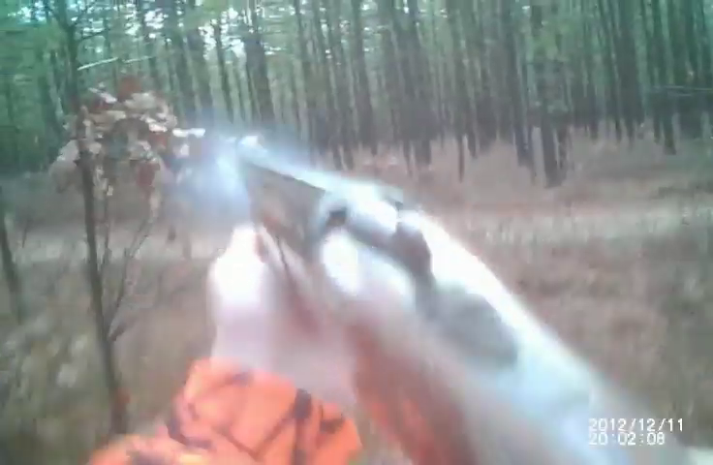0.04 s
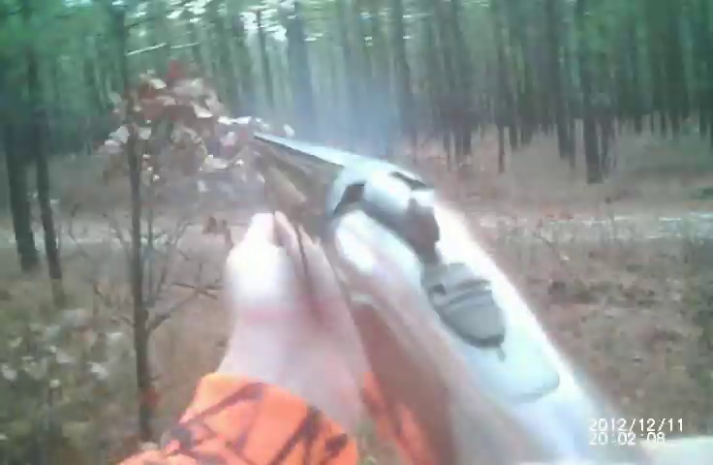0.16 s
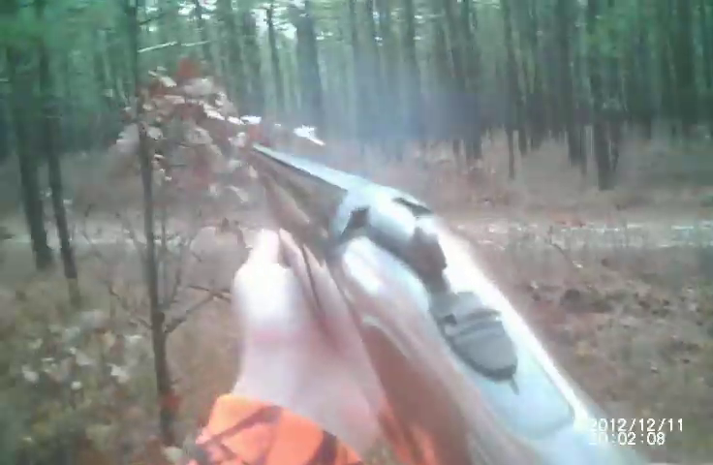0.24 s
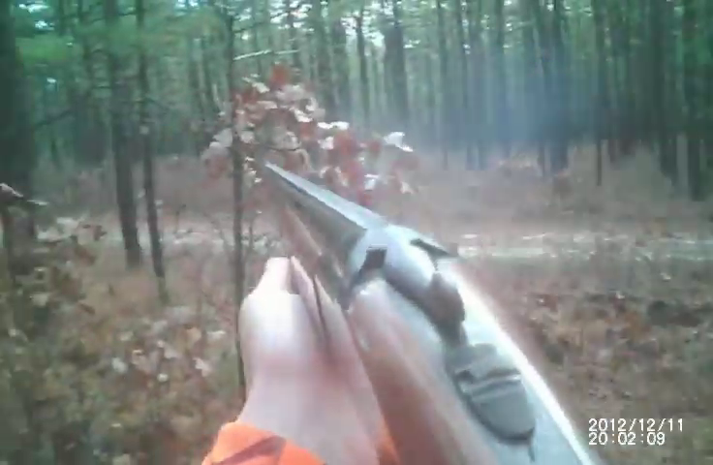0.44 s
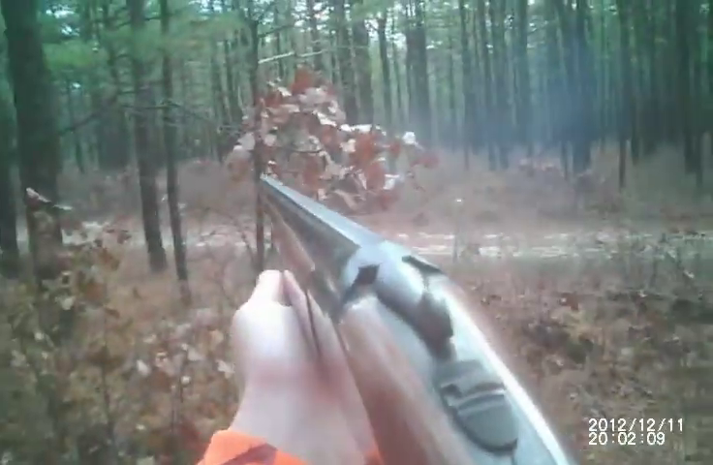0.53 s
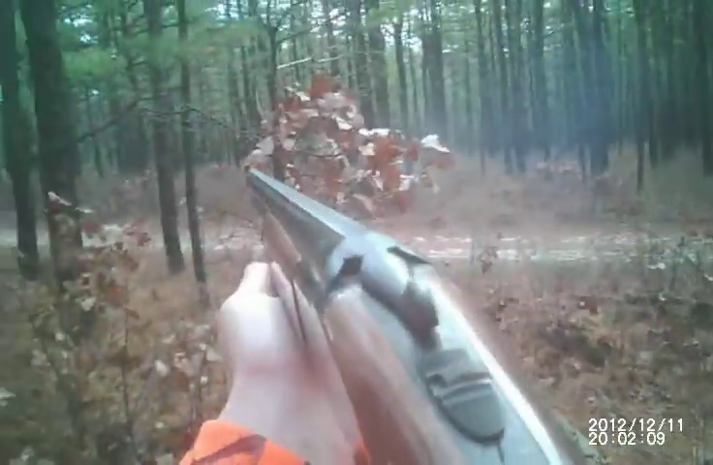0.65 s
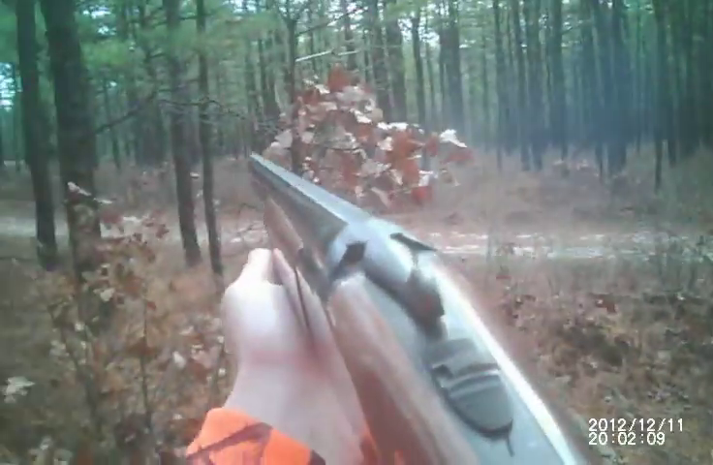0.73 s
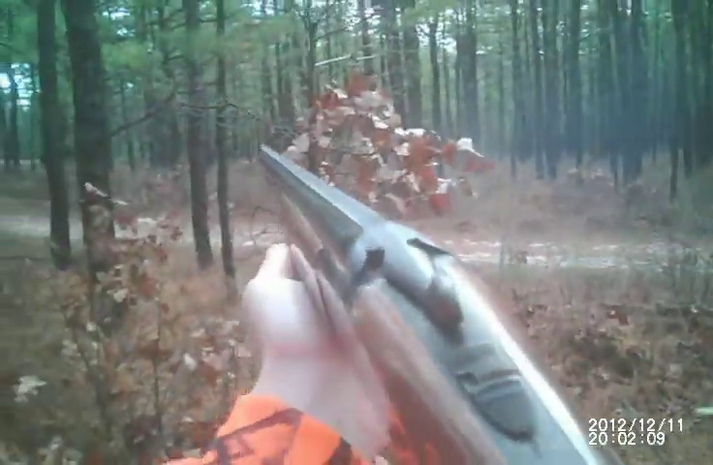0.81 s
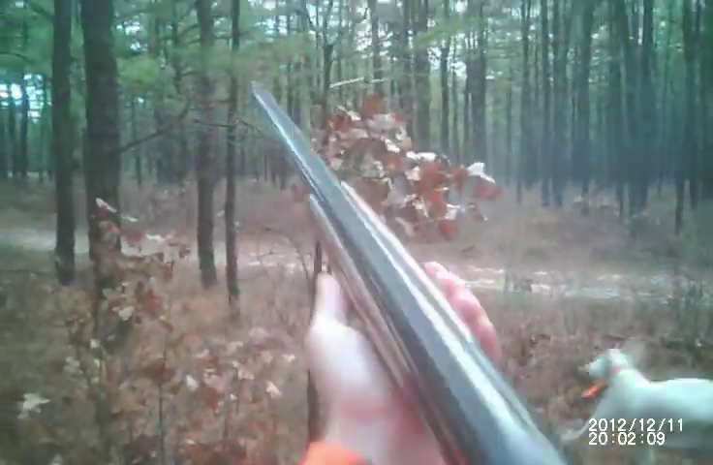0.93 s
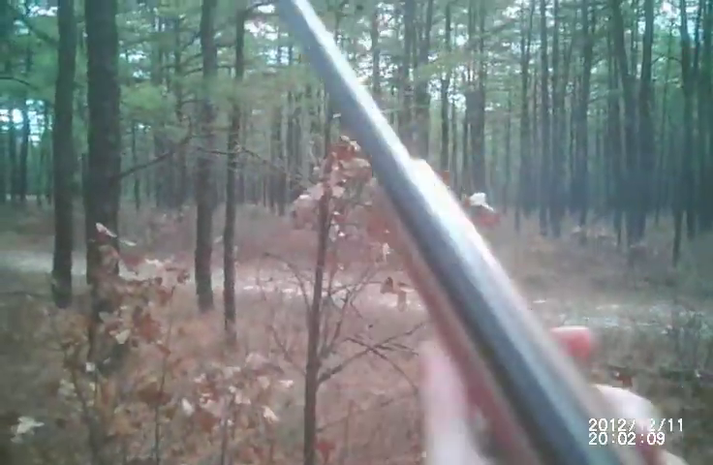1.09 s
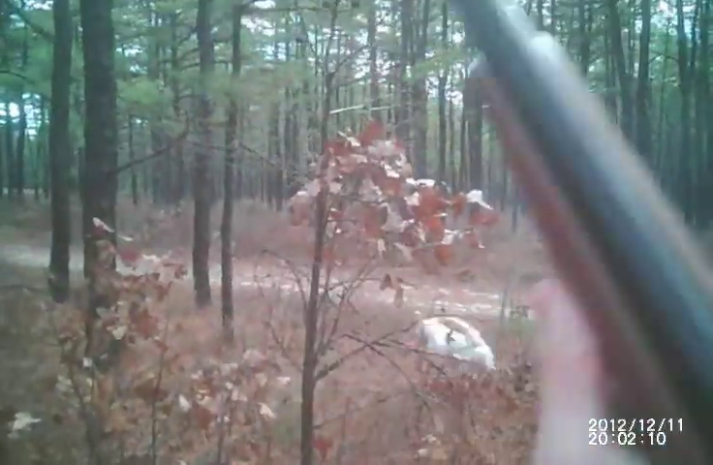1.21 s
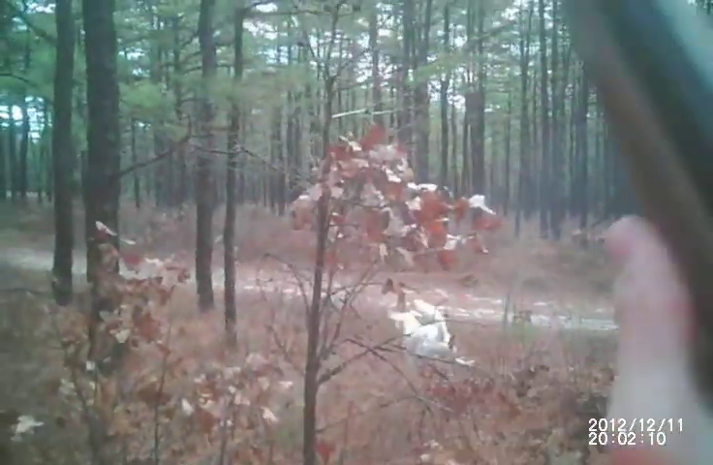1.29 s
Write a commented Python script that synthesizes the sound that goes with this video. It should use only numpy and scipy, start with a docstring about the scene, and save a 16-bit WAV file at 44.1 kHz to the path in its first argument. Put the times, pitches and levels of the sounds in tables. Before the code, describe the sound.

A shotgun blast very close to a small, cheap head-worn camera in a pine wood; a faint dog-collar bell and tiny trigger tick come just before, then a clipped, dull roar of echoes swells and fades.

```python
"""A dog's collar bell tinkles, then a shotgun fires next to a small head camera in a pine wood.
The muzzle blast, an N-shaped wave with a burst of gas noise, overloads the input. Random echoes from
the trunks make a dense roar that swells and fades, band by band; low echoes and a soft hiss lie under it.
Bell and trigger tick are decaying modes. The camera samples at 8 kHz, clips, and plays at the full rate."""
import sys
import numpy as np
from scipy import signal
from scipy.fft import rfft, irfft
from scipy.io import wavfile

SR = 44100
rng = np.random.default_rng(int(sys.argv[2]) if len(sys.argv) > 2 else 0)


def unload_wav(signal):
    """Save mono or channel-first audio to the path in sys.argv[1] as 16-bit WAV at rate SR, clipped to [-1, 1]."""
    wavfile.write(
        sys.argv[1],
        SR,
        np.round(np.clip(np.atleast_2d(signal).T, -1, 1) * 32767).astype(np.int16),
    )


def voltage_ratio(level):
    """Linear amplitude factor for a level in decibels (scalar or array-like)."""
    return 10 ** (np.asarray(level, float) / 20)


N = 59535  # samples
SHOT_S = 0.2165


def unit(x):
    """Scale to rms 1."""
    return x / np.sqrt(np.mean(x ** 2))


def band_noise(low_hz, high_hz):
    """Band-passed white noise of rms 1."""
    sos = signal.butter(2, [low_hz, high_hz], "band", fs=SR, output="sos")
    return unit(signal.sosfilt(sos, rng.standard_normal(N)))


def fade(t, start_s, t60_s):
    """Exponential decay from start_s, 60 dB per t60_s; zero before."""
    return (t >= start_s) * np.exp(-np.log(1000) * np.maximum(t - start_s, 0) / t60_s)


def ring(t, start_s, level_db, modes):
    """Decaying sine modes set ringing by one blow."""
    out = 0
    for hz, mode_db, t60_s in modes:
        sine = np.sin(2 * np.pi * hz * (t - start_s))
        out = out + voltage_ratio(level_db + mode_db) * fade(t, start_s, t60_s) * sine
    return out


def coloured(source, table):
    """Shape a sound by the first two columns (Hz, dB); returns its spectrum and log-frequency axis."""
    rows = np.array(table, float)
    log_hz = np.log(np.arange(N // 2 + 1) * SR / N + 1)
    gain_db = np.interp(log_hz, np.log(rows[:, 0]), rows[:, 1], right=-90)
    return rfft(source) * voltage_ratio(gain_db), log_hz


HAMMER_S, HAMMER_DB, HAMMER_T60_S = 0.2128, -21, 0.05  # lock and primer, just before the blast
BLAST_DB, BLAST_T60_S, N_WAVE_S = 12.5, 0.02, 0.0008
GAS_LOW_HZ, GAS_HIGH_HZ = 905, 2200
THUMP_DB, THUMP_HZ, THUMP_T60_S = -17.5, 110, 0.04  # recoil against the cheek


def shot(t):
    """Hammer crack, N-shaped muzzle pressure wave with a burst of gas, low recoil thump."""
    hiss = band_noise(GAS_LOW_HZ, GAS_HIGH_HZ)
    crack = voltage_ratio(HAMMER_DB) * fade(t, HAMMER_S, HAMMER_T60_S) * hiss
    phase = (t - SHOT_S) / N_WAVE_S
    n_wave = (phase >= 0) * (phase < 1) * (1 - 2 * phase)
    gas = fade(t, SHOT_S, BLAST_T60_S) * hiss
    thump = ring(t, SHOT_S, THUMP_DB, [(THUMP_HZ, 0, THUMP_T60_S)])
    return crack + voltage_ratio(BLAST_DB) * (n_wave + gas) + thump


TRUNK_ECHOES_PER_S, ECHO_SCATTER_DB = 9000, 2.0
COLOUR_AT_S = 0.8
# overall swell and fading of the trunk echoes: (time [s], level [dB])
ROAR_LEVEL = [(.216, 11), (.225, -4), (.25, 9), (.33, -2), (.38, 20.5), (.44, 0), (.53, -6.5), (.6, -7.5),
              (.67, -9.5), (.695, -11.5), (.72, -10), (.75, -14.5), (.86, -16.5), (.89, -19.5),
              (1.08, -22.5), (1.12, -24), (1.35, -29)]
# roar spectrum at COLOUR_AT_S: (frequency [Hz], relative density [dB per Hz], extra fading [dB/s])
ROAR_COLOUR = [(40.1, -43.5, 30), (70, -42.5, 28.5), (126, -24, 28), (260, -18.5, 15), (403, -6.5, 5),
               (522, -0.5, 1), (757, 0.5, 3), (1170, -3.5, 6), (1530, -5.5, 4.5), (1911, -6.5, 9.5),
               (2390, -21.5, 16.5), (2500, -21, 10.5), (3294, -21, 30), (3900, -35, 4.5)]


def roar(t):
    """Thousands of uneven trunk echoes, random in time, sign and size; each band fades at its own pace."""
    chance = rng.random((3, N))
    size = voltage_ratio(-ECHO_SCATTER_DB * np.log(chance[1] + 1e-9))
    echoes = (chance[0] < TRUNK_ECHOES_PER_S / SR) * np.sign(chance[2] - 0.5) * size
    spectrum, log_hz = coloured(echoes, ROAR_COLOUR)
    spectrum = spectrum / np.std(irfft(spectrum, N))
    knots = np.log(np.array(ROAR_COLOUR)[:, 0])
    out = 0
    for k, (_, _, fading_db_per_s) in enumerate(ROAR_COLOUR):
        share = np.interp(log_hz, knots, np.arange(len(knots)) == k)  # overlapping bands sum to one
        out = out + irfft(spectrum * share, N) * voltage_ratio(-fading_db_per_s * (t - COLOUR_AT_S))
    time_s, level_db = np.array(ROAR_LEVEL).T
    return out * voltage_ratio(np.interp(t, time_s, level_db)) * (t > SHOT_S)


BOOM_S, BOOM_WIDTH_S, BOOM_DB, BOOM_LOW_HZ, BOOM_HIGH_HZ = 0.368, 0.029, 4.5, 168, 750


def boom(t):
    """Low boom thrown back by the far edge of the clearing: noise under a Gaussian swell."""
    swell = np.exp(-0.5 * ((t - BOOM_S) / BOOM_WIDTH_S) ** 2)
    return voltage_ratio(BOOM_DB) * swell * band_noise(BOOM_LOW_HZ, BOOM_HIGH_HZ)


RUMBLE_DB, RUMBLE_LOW_HZ, RUMBLE_HIGH_HZ, RUMBLE_T60_S = -32, 60, 200, 2.17


def rumble(t):
    """Far, low echoes that outlast the rest of the bass: slowly decaying noise."""
    return voltage_ratio(RUMBLE_DB) * fade(t, SHOT_S, RUMBLE_T60_S) * band_noise(RUMBLE_LOW_HZ, RUMBLE_HIGH_HZ)


# strokes of the collar bell: (time [s], level [dB])
BELL_STROKES = [(.0195, -53), (.046, -55), (.1636, -35)]
# bell modes: (frequency [Hz], relative level [dB], t60 [s])
BELL_MODES = [(1818, 0, .9), (1780, -10, .7), (3620, -13, .06)]


def bell(t):
    """Dog's collar bell: every stroke rings the same modes."""
    return sum(ring(t, stroke_s, db, BELL_MODES) for stroke_s, db in BELL_STROKES)


TICK_S, TICK_DB = 0.1838, -33
# modes of the small metal tick: (frequency [Hz], relative level [dB], t60 [s])
TICK_MODES = [(1150, 0, .025), (1450, -3, .02), (2750, -4, .02), (3250, -2, .022)]


def trigger_tick(t):
    """Small metal tick of the trigger: short, strongly damped modes."""
    return ring(t, TICK_S, TICK_DB, TICK_MODES)


AIR_DB = -51
# spectrum of the wood's hiss: (frequency [Hz], relative density [dB per Hz])
AIR_COLOUR = [(60, -18), (170, -4.5), (400, -4.5), (800, -4.5), (1200, -7.5), (1850, -2.5), (2150, -16.5),
              (3500, -10), (4000, -28.5)]


def air():
    """Soft steady hiss of the wood: coloured noise."""
    spectrum, _ = coloured(rng.standard_normal(N), AIR_COLOUR)
    return voltage_ratio(AIR_DB) * unit(irfft(spectrum, N))


MIC_LOW_HZ = 75.7


def scene():
    """All sources through the microphone's bass cut."""
    t = np.arange(N) / SR
    mix = shot(t) + roar(t) + boom(t) + rumble(t) + bell(t) + trigger_tick(t) + air()
    bass_cut = signal.butter(4, MIC_LOW_HZ, "high", fs=SR, output="sos")
    return signal.sosfilt(bass_cut, mix)[None]


def low_pass(x):
    """Removes everything above the highest recorded frequency."""
    return signal.sosfilt(signal.butter(12, 16520, fs=SR, output="sos"), x)


INPUT_TOP, PLAY_TOP, ROLL_OFF_HZ = 0.67, 0.7, 4400  # clip levels re full scale
# brief level dips: (start [s], end [s])
DIP_SPANS = [(.2235, .2425), (.2835, .3025), (.4465, .4605), (.5065, .5225), (.8638, .883)]
# gain in each dip: (level [dB])
DIP_DB = [-11.5, -15.5, -11.5, -6.5, -10.5]


def record(dry):
    """8 kHz sampling, abrupt dips, clipping; smoothed up to full rate, where overshoot clips again."""
    low = signal.resample_poly(dry, 80, 441, axis=1)
    t = np.arange(low.shape[1]) / 8000
    gain_db = sum(db * (t > start_s) * (t < end_s) for (start_s, end_s), db in zip(DIP_SPANS, DIP_DB))
    low = np.clip(low * voltage_ratio(gain_db), -INPUT_TOP, INPUT_TOP)
    full = signal.resample_poly(low, 441, 80, axis=1)[:, :N]
    full = signal.sosfiltfilt(signal.butter(3, ROLL_OFF_HZ, fs=SR, output="sos"), full)
    mix = np.clip(full, -PLAY_TOP, PLAY_TOP)
    return low_pass(mix)


dry = scene()
out = record(dry)
unload_wav(out)
```